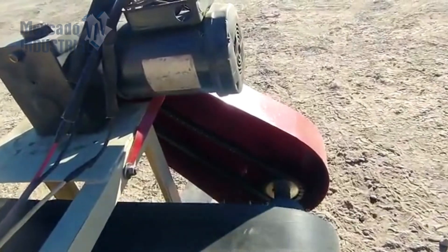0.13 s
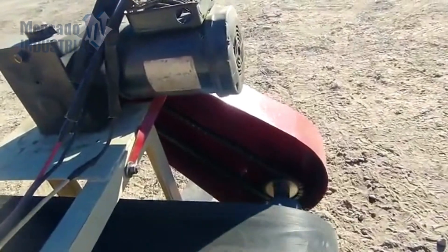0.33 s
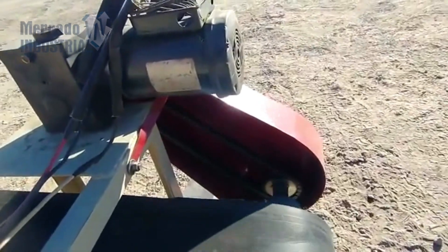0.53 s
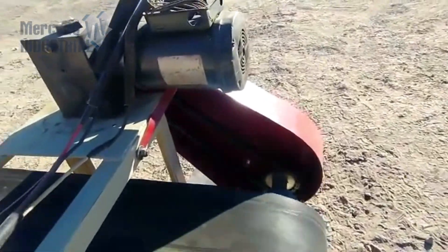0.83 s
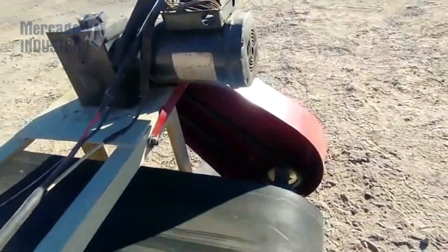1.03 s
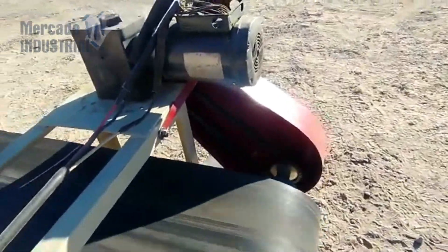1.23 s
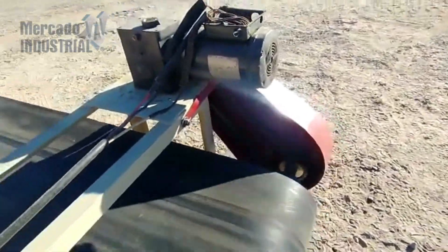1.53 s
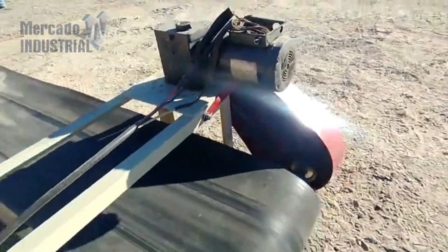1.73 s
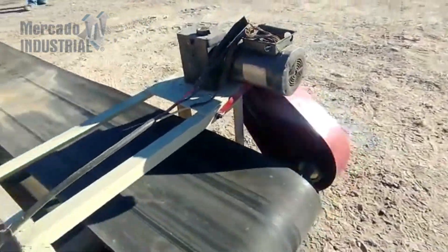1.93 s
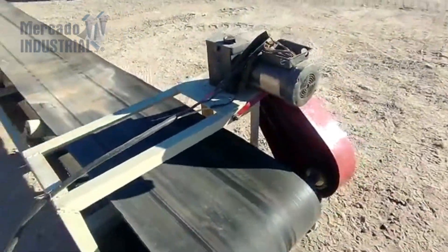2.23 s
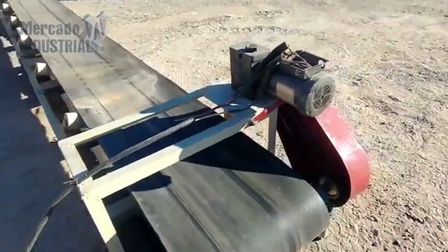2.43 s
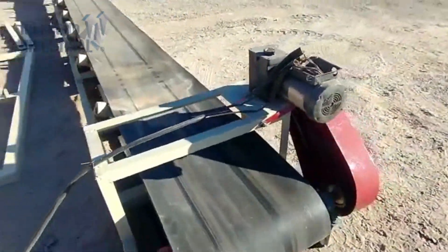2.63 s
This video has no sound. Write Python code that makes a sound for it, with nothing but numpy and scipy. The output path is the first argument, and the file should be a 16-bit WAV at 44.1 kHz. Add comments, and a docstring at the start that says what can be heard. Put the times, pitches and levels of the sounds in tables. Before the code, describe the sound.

Electric motor's chain drive clatters harshly in its metal guard, running a conveyor belt outdoors, gradually receding

```python
"""An electric motor drives a conveyor through a chain under a sheet-metal guard, outdoors.
Near at first: chain links hit sprocket teeth, harder once every shaft turn, and ring the guard,
over frame hum, short knocks and belt rumble, while low noise bursts show a breeze, mostly at the left port.
The microphone then backs away and turns: tone and stereo balance shift past midway, the gusts fade.
Far away the tooth hum weakens, and the rattle drops at the end. Noise, pulses and sines make it all."""
import sys
import numpy as np
from scipy import signal
from scipy.fft import rfft, irfft
from scipy.io import wavfile
from scipy.ndimage import uniform_filter1d

SR = 44100
rng = np.random.default_rng(int(sys.argv[2]) if len(sys.argv) > 2 else 0)


def volts_from_decibels(level):
    """Turn decibel levels (scalar or array-like) into linear amplitude factors."""
    exponent = np.asarray(level, float) / 20
    return 10 ** exponent


def waveform_to_disk(signal):
    """Save audio, clipped to [-1, 1], as 16-bit WAV at the path in sys.argv[1]."""
    frames = np.transpose(np.atleast_2d(signal))
    scaled = np.clip(frames, -1, 1) * 32767
    samples = np.round(scaled).astype(np.int16)
    wavfile.write(sys.argv[1], SR, samples)


N = 123480
T, HZ = np.arange(N) / SR, np.fft.rfftfreq(N, 1 / SR)
SHAFT_HZ, TEETH = 27.6, 13  # average shaft rate, before its small leads and lags; sprocket teeth
TOOTH_HZ = TEETH * SHAFT_HZ


def evened(x):
    """Scales to an rms of 1."""
    return x / np.sqrt(np.mean(x ** 2) + 1e-20)


def spectrum(points, column=1):
    """Reads a table by pitch at every frequency, on a nearly logarithmic pitch scale."""
    table = np.array(points, float)
    return np.interp(np.log(HZ + 30), np.log(table[:, 0] + 30), table[:, column])


def curve(points, column=1):
    """Reads a table by time at every sample."""
    table = np.array(points, float)
    return np.interp(T, table[:, 0], table[:, column])


def coloured(x, gain):
    """Filters a sound by a gain at every frequency."""
    return irfft(rfft(x) * gain, N)


def mode(hz, width_hz):
    """A resonance, as a filter that turns white noise of rms 1 into ringing of rms 1."""
    return np.sqrt(SR / (np.pi * width_hz)) / (1 + 2j * (HZ - hz) / width_hz)


def wander(rate_hz):
    """Slow random drift of rms 1: noise with the changes faster than rate_hz weakened."""
    return evened(coloured(rng.standard_normal(N), 1 / (1 + (HZ / rate_hz) ** 4)))


def left_right(left_db, right_db):
    """One level for each microphone port, stacked as two rows."""
    return np.array([[left_db], [right_db]])


def breeze():
    """Moving air buffets the two ports: lumpy low noise, unrelated left and right, weaker at the right."""
    # Tone of the air: pitch_hz, relative_level_db_per_hz
    air_tone = [(60, -9), (100, -0.5), (160, -0.5), (260, -10), (500, -52)]
    # Gusts at the left port, before the random lumps: time_s, level_db
    gust_levels = [(0, -20.5), (.06, -32.5), (.14, -44), (.31, -66), (.35, -22.5), (.39, -58), (.6, -37.5),
                   (.78, -56), (.84, -34), (.9, -55), (1.5, -77), (2.1, -64), (2.4, -69), (2.8, -70)]
    air = evened(coloured(rng.standard_normal((2, N)), volts_from_decibels(spectrum(air_tone))))
    lumps_db = 3 * wander(34)
    return air * volts_from_decibels(curve(gust_levels) + lumps_db + left_right(0, -11))


def rumble():
    """The belt rolls over its idlers: low noise, partly shared by the two ports."""
    # Tone of the rumble: pitch_hz, relative_level_db_per_hz
    rumble_tone = [(24, -56), (40, -24), (75, 0.5), (306, -8), (355, -11), (440, -16), (560, -23),
                   (1000, -31), (1300, -46), (2200, -120)]
    # Level midway between the ports: time_s, level_db
    rumble_levels = [(0.0, -53), (0.38, -45), (2.8, -48)]
    shared, spread = rng.standard_normal((2, N))
    spread = 0.4 * spread
    noise = np.array([shared + spread, shared - spread])
    rolling = evened(coloured(noise, volts_from_decibels(spectrum(rumble_tone))))
    return rolling * volts_from_decibels(curve(rumble_levels) + left_right(2, -2))


def frame_hum():
    """The frame hums at the average tooth rate, with fuzz around that pitch, and has a low noise band."""
    # Frame levels: time_s, tooth_hum_db, frame_band_db
    frame_levels = [(0, -46, -46), (.35, -47.5, -47.5), (.7, -49, -63), (.9, -46.5, -49.5), (1.3, -49, -48),
                    (1.45, -48.5, -61.5), (1.9, -54, -58), (2.3, -61, -67.5), (2.8, -77, -53)]
    fuzz = coloured(rng.standard_normal(N), mode(TOOTH_HZ, 20))
    hum = evened(np.sin(2 * np.pi * TOOTH_HZ * T) + 0.45 * fuzz)
    # Applying the resonance twice gives the band steeper sides
    band = evened(coloured(rng.standard_normal(N), mode(562, 38) ** 2))
    return hum * volts_from_decibels(curve(frame_levels)) + band * volts_from_decibels(curve(frame_levels, column=2))


def frame_knocks():
    """Short knocks of the frame: dying sines that start in step with the hum, with a little noise."""
    # Knocks: peak_time_s (approximate), relative_level_db, pitch_hz
    knock_list = [(0.226, -38, 388), (0.444, -35.5, 370), (0.559, -31.5, 355), (0.679, -28.5, 365),
                  (0.913, -35, 405), (1.04, -36.5, 375), (1.272, -37, 360.5), (1.39, -37, 369),
                  (1.495, -35.5, 353.7), (1.626, -34, 368), (1.731, -40.5, 372), (1.858, -40, 372),
                  (2.422, -39, 361), (2.553, -34.5, 367), (2.665, -40, 244)]
    rise_s, decay_60db_s = 0.00716, 0.03
    thud = evened(coloured(rng.standard_normal(N), mode(344, 250) ** 2))
    knocks = np.zeros(N)
    for peak_s, level_db, pitch_hz in knock_list:
        start_s = peak_s - rise_s
        age_s = np.maximum(T - start_s, 0)
        shape = (age_s / rise_s) ** 2 * volts_from_decibels(-60 * age_s / decay_60db_s)
        hum_turns = TOOTH_HZ * start_s  # where the hum is in its cycle at the start
        tone = np.sin(2 * np.pi * (pitch_hz * age_s + hum_turns))
        knocks += volts_from_decibels(level_db + 0.5) * shape / shape.max() * (tone + 0.2 * thud)
    return knocks * volts_from_decibels(left_right(1.5, -1.5))


def shaft_turns():
    """Turns of the motor shaft since the start, running a little ahead of an even rate."""
    # Shaft lead, before smoothing: time_s, lead_turns
    shaft_lead = [(0.0, 0.27), (0.3, 0.38), (0.65, 0.55), (0.9, 0.43), (1.1, 0.28), (1.5, 0.23), (1.7, 0.4),
                  (2.0, 0.35), (2.3, 0.3), (2.6, 0.34)]
    return SHAFT_HZ * T + uniform_filter1d(curve(shaft_lead), size=4000)


def ports(shared, scattered, gains):
    """Two ports hear shared and scattered sound (as spectra) from each station, blended over time."""
    # Times at the near, midway and far stations: time_s
    station_times = (.45, 1.4, 2.35)
    # Left minus right level: pitch_hz, near_db, midway_db, far_db
    port_balance = [(700, -2.5, -1.5, -2.5), (1300, -3, -2.5, 0.5), (2600, -10.5, -9.5, -14),
                    (3260, -13.5, -13, -9.5), (4470, -2.5, 4.5, 7.5), (5440, -7, 9, 9), (6460, -4, 1, -5.5),
                    (7050, -2.5, -2, 2), (8250, -14, 0, 5.5), (9330, -8, -3.5, 5), (10400, 3, 2, 9.5)]
    # How far left leads right: pitch_hz, near_radians, midway_radians, far_radians
    port_phase = [(1100, 0.41, 0.11, -0.6), (1610, 0.67, 0.13, 0.77), (2290, 2.56, 1.95, 1.1),
                  (2850, 2, 1.15, 0.5), (3610, 2.7, 2.06, 0.3), (4340, 5.3, 5, 2), (4940, 4.8, 4.56, 8.5),
                  (5230, 4.74, 4.1, 3.5), (6170, 7.4, 6.1, 5), (8900, 5.87, 7.3, 6.5)]
    # How alike the two ports are: pitch_hz, likeness_0_to_1
    port_likeness = [(1000, 0.83), (2500, 0.73), (5500, 0.75), (6300, 0.92), (8500, 0.95), (11000, 0.93)]
    same = spectrum(port_likeness)
    left_sound = same * shared + np.sqrt(1 - same ** 2) * scattered
    out = np.zeros((2, N))
    for station, gain in enumerate(gains):
        ratio = volts_from_decibels(spectrum(port_balance, column=1 + station))
        right = gain * np.sqrt(2 / (1 + ratio ** 2))  # keeps the average power of the two ports
        left = ratio * right * np.exp(1j * spectrum(port_phase, column=1 + station))
        weight = np.interp(T, station_times, np.arange(3) == station)
        out += weight * irfft(np.array([left * left_sound, right * shared]), N)
    return out


def rings():
    """The loudest guard modes ring as narrow noise, each swelling and throbbing in its own way."""
    # Pitch of each ring: pitch_hz
    ring_pitches = (2932, 3131, 3543, 3574)
    # How evenly each ring holds its level: steadiness_0_to_1
    ring_steadiness = (.25, .2, .35, .35)
    # For each ring: width_hz (before extra narrowing), throb_db, throb_lag_turns, column of ring_levels
    ring_shapes = [(23, 2.8, .55, 1), (16, .8, .8, 2), (18, 4., 0.05, 3), (20, 4., 0.05, 3)]
    # Ring levels: time_s, first_ring_db, second_ring_db, upper_pair_db (each)
    ring_levels = [(0, -22.5, -21, -31), (.25, -22.5, -26, -30), (.36, -21.5, -22.5, -34),
                   (.55, -23, -23.5, -24), (.7, -21, -25, -32), (.77, -25, -27, -27), (.9, -21.5, -30, -43),
                   (1.05, -22, -26.5, -34.5), (1.3, -27.5, -25.5, -32.5), (1.75, -27, -25, -33.5),
                   (1.9, -34.5, -29.5, -36), (2.2, -35.5, -30.5, -34), (2.45, -42, -26.5, -37),
                   (2.62, -28, -32.5, -37), (2.8, -33, -38.5, -43.5)]
    total = np.zeros((2, N))
    for hz, steady, shape in zip(ring_pitches, ring_steadiness, ring_shapes):
        width_hz, throb_db, lag_turns, column = shape
        throb = evened(volts_from_decibels(throb_db * np.cos(2 * np.pi * (shaft_turns() - lag_turns))))
        narrow = mode(hz, width_hz) / (1 + ((HZ - hz) / (4 * width_hz)) ** 4)
        ring = evened(coloured(rng.standard_normal((2, N)), narrow))
        # Dividing by part of its own outline makes a ring steadier
        outline = abs(signal.hilbert(ring))
        ring = evened(ring / (outline + 0.2) ** steady)
        total += throb * volts_from_decibels(curve(ring_levels, column=column)) * ring
    return ports(rfft(total[0]), rfft(total[1]), [1, 1, 1])


def links():
    """Chain links hit sprocket teeth with uneven timing and force, blended with rubbing noise."""
    jitter, spread_db = 0.3, 3  # typical timing error in tooth spacings; typical force variation
    hit_share = 0.32  # part of the power that is hits, the rest is rubbing
    at = np.flatnonzero(np.diff(np.floor(TEETH * shaft_turns())) > 0)
    timing, sign, force = rng.standard_normal((3, len(at)))
    at = np.clip(at + jitter * timing * SR / TOOTH_HZ, 0, N - 1).astype(int)
    hits = np.zeros(N)
    hits[at] = np.sign(sign) * volts_from_decibels(spread_db * np.clip(force, -2, 2))
    rubbing = rng.standard_normal(N)
    return np.sqrt(hit_share) * evened(hits) + np.sqrt(1 - hit_share) * rubbing


def guard_gains():
    """How strongly the guard answers the chain: a broad body plus sharp modes, for each station."""
    # Broad rattle, before later level changes: pitch_hz, near_db_per_hz, midway_db_per_hz, far_db_per_hz
    guard_body = [(640, -75.5, -76.5, -78.5), (975, -74.5, -74.5, -77), (1188, -67.5, -70.5, -71),
                  (1325, -56.5, -59, -86), (1670, -59, -67, -60.5), (2160, -77, -61.5, -78),
                  (2870, -62, -52.5, -57), (3510, -56, -59.5, -66), (3810, -60.5, -56, -92),
                  (4700, -62.5, -75.5, -87), (4660, -63.5, -64, -91), (6850, -75, -68, -80),
                  (7840, -58.5, -74, -79.5), (10030, -68, -70.5, -76), (10400, -87, -80, -84),
                  (12200, -78.5, -91, -79.5), (13600, -91, -101, -84), (14600, -103, -108, -87.5)]
    # Pitch of each guard mode: pitch_hz
    mode_pitches = [1496, 1593, 1894, 2110, 2250, 2365, 2454, 2756, 3897, 4371, 4776, 4984, 5081, 5283,
                    5490, 5587, 5810, 5943, 6104, 6298, 6578, 6998, 7601, 7956, 8387, 8903, 9593, 9959,
                    10860, 11311, 11644, 11919, 12304, 12983]
    # For each mode, before later level changes: width_hz, near_db, midway_db, far_db
    guard_modes = [(32.5, -44, -36, -35.5), (19.5, -48, -35.5, -44), (71.5, -32.5, -34, -37.5),
                   (19, -32, -37, -40), (26.2, -35.5, -41, -39), (30, -32, -47, -37),
                   (75.4, -32.5, -37, -34.5), (83, -28.5, -66, -30.5), (33, -38, -55, -38),
                   (87, -46, -38, -45.5), (27.4, -37, -65, -52), (36, -38, -43, -61),
                   (44, -29, -34.5, -38.5), (32, -31.5, -54, -65), (70, -32, -41, -48.5),
                   (27, -37, -57, -56), (45, -54, -42, -60), (25, -33, -71, -40.5), (73, -47, -39.5, -45),
                   (37.6, -32, -61, -45), (24.4, -38, -42.5, -43.5), (99, -31, -40, -37.5),
                   (44, -38.5, -39, -47.5), (90, -35, -37, -59), (60, -35.5, -36.5, -45.5),
                   (63.72, -32, -37.5, -46.5), (57, -43.5, -44, -52), (41, -40, -52, -54),
                   (50, -48, -42, -56), (45, -44.5, -63, -62), (45, -54, -50, -60), (45, -53, -59, -59),
                   (45, -54, -55, -65), (50, -50, -48.5, -61)]
    gains = []
    for station in range(3):
        body = np.sqrt(SR / 2) * volts_from_decibels(spectrum(guard_body, column=1 + station))
        modes = 0
        for k, (hz, row) in enumerate(zip(mode_pitches, guard_modes)):
            modes = modes + (-1) ** k * volts_from_decibels(row[1 + station]) * mode(hz, row[0])
        low_cut = 1 + (1100 / (HZ + 1)) ** 8
        gains.append(body + modes / low_cut)
    return gains


def rattle():
    """The chain shakes the guard once harder per shaft turn; the treble is damped between hard hits."""
    # How much of the power follows the shaft turn: pitch_hz, share_0_to_1
    throb_share = [(1500, 0.26), (3500, 0.29), (5000, 0.79), (13000, 1)]
    # Level changes: time_s, below_4khz_db, above_4khz_db
    rattle_levels = [(0, 0.3, 1.3), (.36, .5, 0), (.7, -0.4, 1.5), (.8, -0.5, -2), (1.1, -0.5, -1),
                     (1.5, -2, -1.5), (1.65, -2.5, -2), (1.9, -1, -0.5), (2.2, -0.5, -2.5), (2.5, -2.5, -1),
                     (2.8, -5.5, -7)]
    angle = 2 * np.pi * shaft_turns()
    # The 2nd harmonic makes the throb rise faster than it falls, the 3rd flattens its top
    beat = np.cos(angle) - 0.23 * np.sin(2 * angle) - 0.15 * np.cos(3 * angle)
    throb = evened(volts_from_decibels(3 * beat + 1.2 * wander(12)))
    share = spectrum(throb_share)
    shaking = []
    for _ in range(2):  # shared, then scattered
        throbbing, steady = rfft(throb * links()), rfft(rng.standard_normal(N))
        shaking.append(np.sqrt(share) * throbbing + np.sqrt(1 - share) * steady)
    both = ports(*shaking, guard_gains())
    treble = irfft(rfft(both) / (1 + (4000 / (HZ + 1)) ** 16), N)
    lag_turns = 0.04
    damped = treble * evened(volts_from_decibels(1.5 * np.cos(angle - 2 * np.pi * lag_turns)))
    return (both - treble) * volts_from_decibels(curve(rattle_levels)) + damped * volts_from_decibels(curve(rattle_levels, column=2))


def scene():
    """All sources together at the two microphone ports."""
    return breeze() + rumble() + frame_hum() + frame_knocks() + rings() + rattle()


def low_pass(x):
    """Removes everything above the highest recorded frequency."""
    return signal.sosfilt(signal.butter(12, 15760, fs=SR, output="sos"), x)


def record(dry):
    """The lows are cut around 55 Hz, then the highest peaks round off below a ceiling of 0.95."""
    cut = coloured(dry, HZ ** 2 / (HZ ** 2 + 55 ** 2))
    rounded = cut / (1 + (cut / 0.95) ** 4) ** (1 / 4)
    return low_pass(rounded)


dry = scene()
out = record(dry)
waveform_to_disk(out)
```